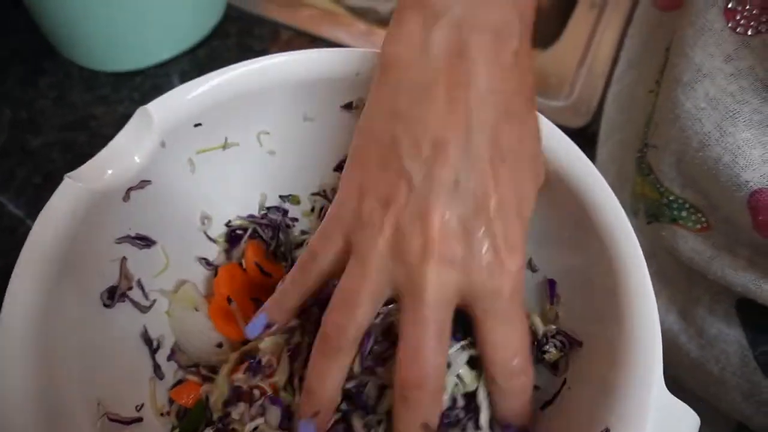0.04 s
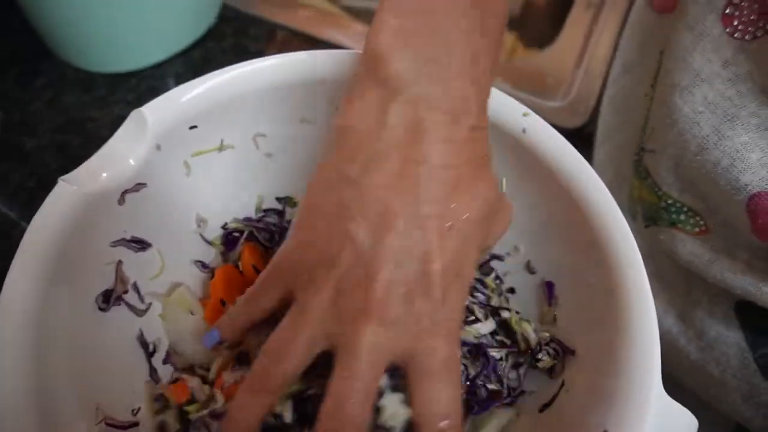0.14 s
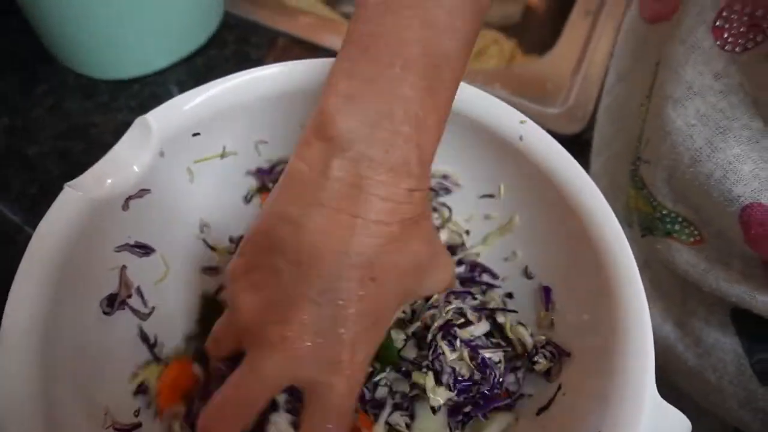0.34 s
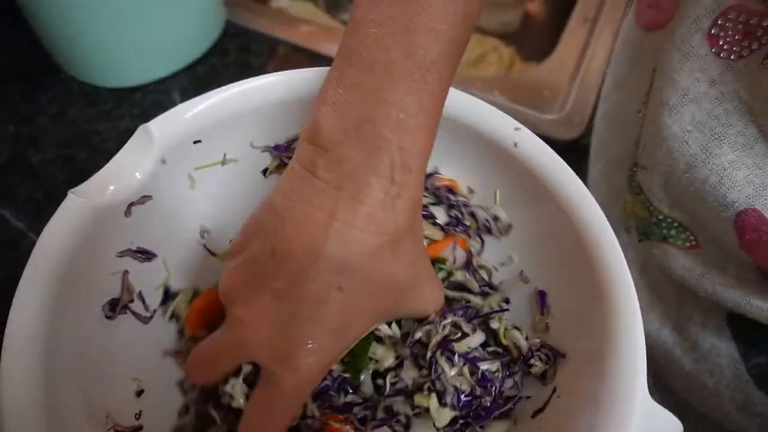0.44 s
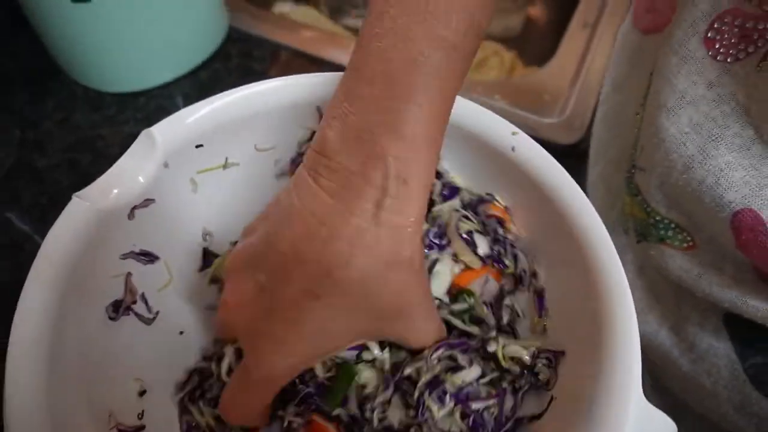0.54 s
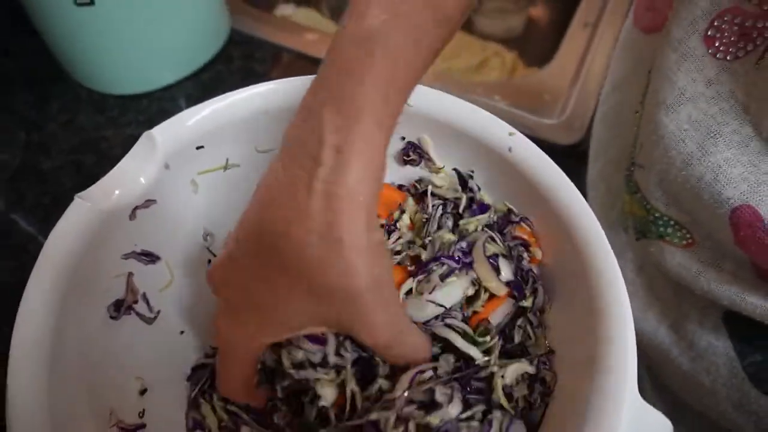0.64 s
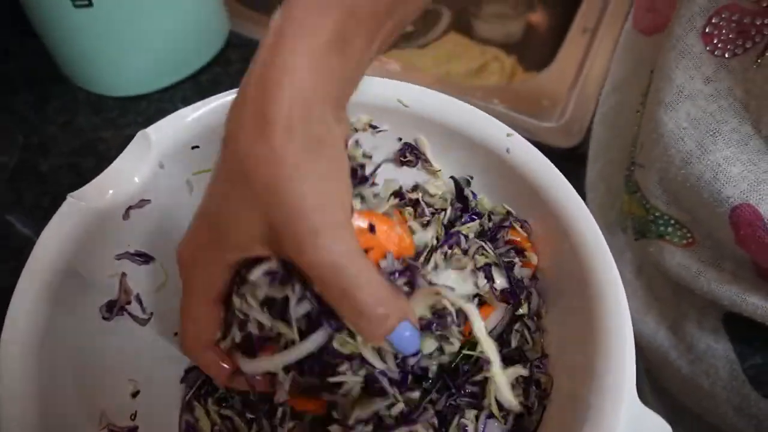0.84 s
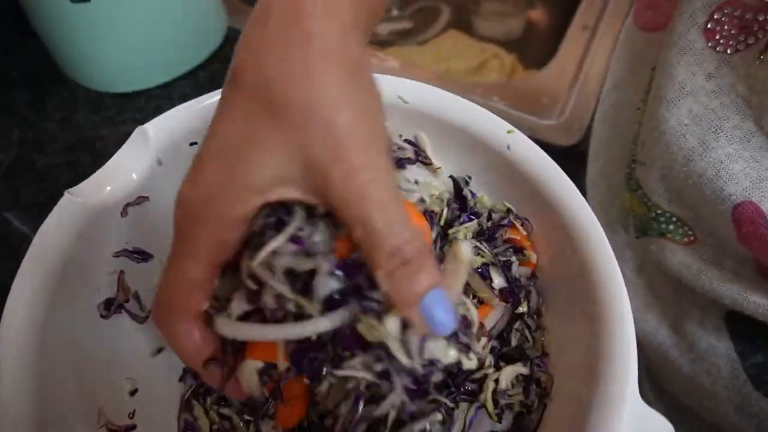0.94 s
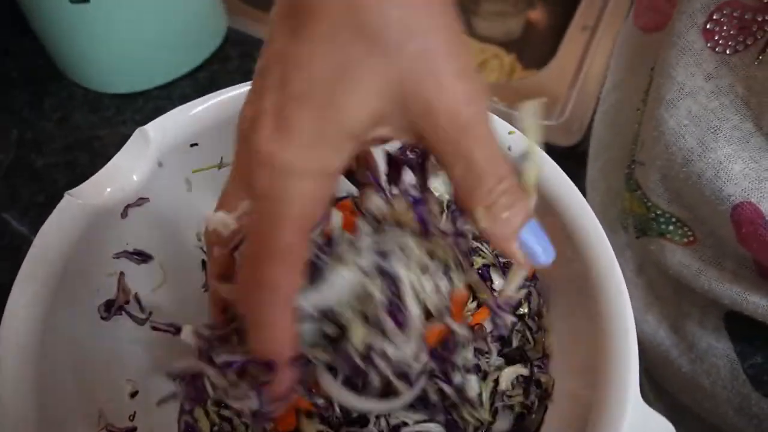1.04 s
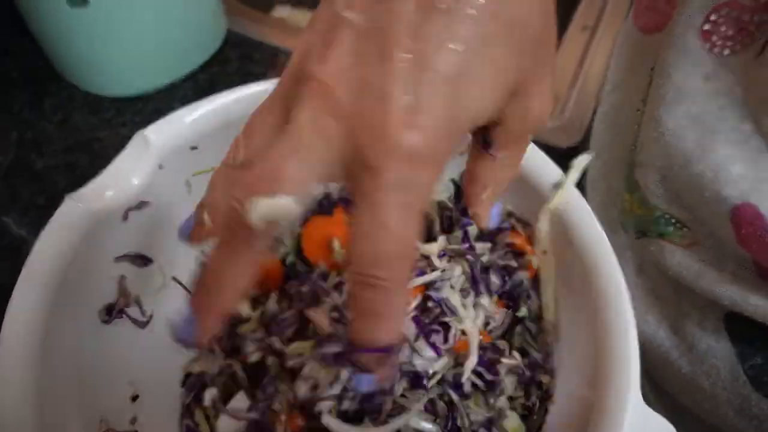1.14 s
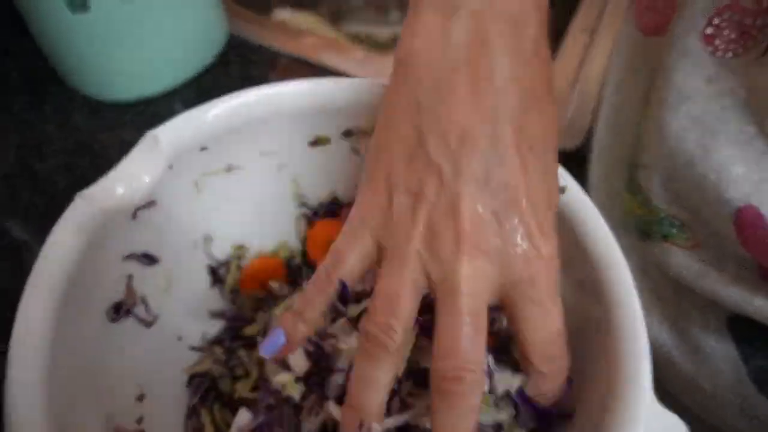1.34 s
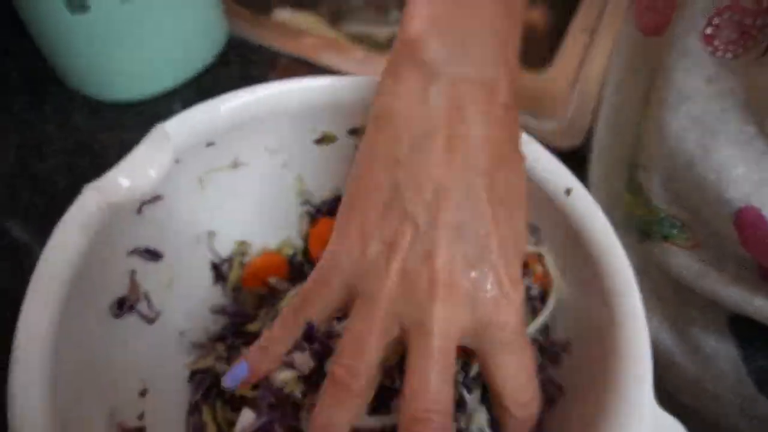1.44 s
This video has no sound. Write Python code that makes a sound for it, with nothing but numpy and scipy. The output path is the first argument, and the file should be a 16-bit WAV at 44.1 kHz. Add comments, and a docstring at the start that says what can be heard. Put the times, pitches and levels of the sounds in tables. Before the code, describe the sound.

A hand squeezes shredded cabbage and carrot in a plastic bowl: a wet rustle swells with quick crackling crunches and snaps, then drops to sparse faint ticks. Close microphone, quiet kitchen with a short reflection.

```python
"""A hand digs into shredded cabbage and carrot in a plastic bowl: faint bumps ring the bowl's damped modes.
Wet shreds rustle in thousands of filtered ticks, strongest at mid-scene as the fist squeezes.
Meanwhile fibre bundles crunch in fast runs of cracks, strands snap as damped sines, more bumps thud softly.
The fistful is lifted and falls: the rustle sinks, then sparse faint crunches and snaps follow.
Heard from close by in a quiet kitchen: a short noise tail, steady filtered noise and a faint tone."""
import sys
import numpy as np
from scipy import signal
from scipy.fft import rfft, irfft, next_fast_len
from scipy.io import wavfile

SR = 44100
rng = np.random.default_rng(int(sys.argv[2]) if len(sys.argv) > 2 else 0)


def put_to_file(sound):
    """Save the sound as 16-bit audio at rate SR, in the file named by the first command-line argument."""
    columns = np.atleast_2d(sound).T  # one column per channel
    safe = np.clip(columns, -1, 1)
    whole_steps = np.round(safe * 32767)
    wavfile.write(sys.argv[1], SR, whole_steps.astype(np.int16))


N = 66150
T = np.arange(N) / SR


def from_db(db):
    """Decibels to gain."""
    return 10 ** (np.asarray(db) / 20)


def rms_one(x):
    """Scale to unit power."""
    return x / np.sqrt(np.mean(x ** 2) + 1e-20)


def cut(x, hz, kind, order=2):
    """Butterworth low- or high-pass."""
    sos = signal.butter(order, min(hz, .45 * SR), kind, fs=SR, output="sos")
    return signal.sosfilt(sos, x)


def colour(x, points):
    """Minimum-phase filter that follows a (Hz, dB) table, made by folding the cepstrum."""
    size = 2 * next_fast_len(N)
    hz, db = np.transpose(points)
    freq = np.maximum(np.arange(size // 2 + 1) * SR / size, 1)
    gain = from_db(np.interp(np.log(freq), np.log(hz), db))
    cepstrum = irfft(np.log(gain))
    cepstrum[1:size // 2] *= 2
    cepstrum[size // 2 + 1:] = 0
    response = np.exp(rfft(cepstrum))
    return irfft(rfft(x, size) * response)[..., :N]


# mean and spread over the pops; positive favours the left
LEFT_DB, PAN_SPREAD_DB, LEAD_US, LEAD_SPREAD_US = 0.9, 1.05, 12.5, 14.7
RISE_CYCLES = 0.14


def pops(start_s, height, hz, cycles, size=384):
    """Damped sines, 60 dB down after the given cycles, each with its own stereo level and time offset."""
    spot = rng.standard_normal((len(start_s), 2))
    pan_db = LEFT_DB + PAN_SPREAD_DB * spot[:, 0]
    lead_s = (LEAD_US + LEAD_SPREAD_US * spot[:, 1]) / 10 ** 6
    index = np.maximum(start_s * SR, 0).astype(int)[:, None] + np.arange(size)
    decay_per_cycle = np.float32(np.log(1000) / np.reshape(cycles, (-1, 1)))
    channels = []
    for side in (1, -1):
        onset_s = (start_s - side * lead_s / 2)[:, None]
        turns = (np.maximum(index / SR - onset_s, 0) * hz[:, None]).astype("f4")
        decay = np.minimum(turns * decay_per_cycle, 20)
        wave = np.sin(2 * np.pi * turns) * np.exp(-decay) * np.tanh(turns / RISE_CYCLES)
        wave = wave * (height * from_db(side * pan_db / 2))[:, None]
        channels.append(np.bincount(index.ravel(), wave.ravel(), N)[:N])
    return np.array(channels)


def sizes(count, spread_db):
    """Many small grains and a few large ones, of either sign."""
    chance = rng.random((count, 2))
    size_db = spread_db * np.minimum(-np.log(1 - chance[:, 0]), 4.5)
    return from_db(size_db) * np.sign(chance[:, 1] - .5)


# Rubbing of the shreds. Each row: time in seconds, body in dB, treble in dB, both before RUSTLE_DB.
RUSTLE_LEVELS = [(0, -74.5, -73), (0.085, -76, -74), (0.099, -48, -52.5), (0.154, -55, -58),
                 (.2, -45.5, -51.5), (.283, -49.5, -49), (0.351, -46, -47), (.42, -43, -45),
                 (.5, -39.5, -43.5), (.615, -39.5, -44), (0.689, -46, -55), (.78, -53.5, -61),
                 (.822, -49.5, -59), (0.854, -57.5, -66), (.95, -69, -68.5), (1.04, -72, -65),
                 (1.094, -69.5, -70), (1.116, -65.5, -71), (1.16, -70.5, -67.5), (1.205, -59.5, -61.5),
                 (1.25, -97, -91), (1.34, -76, -80), (1.41, -71, -75.5), (1.455, -65, -68.5),
                 (1.5, -63.5, -66)]
# Filter on the ticks. Each row: frequency in Hz, gain in dB.
RUSTLE_COLOUR = [(60, -56.5), (200, -37.5), (450, -36), (640, -24.5), (790, -31.5), (1100, -17.5),
                 (1230, -17), (1550, -4.5), (1780, -3.5), (2200, -2.5), (2550, -3.5), (3300, -5),
                 (4400, -3), (6800, -16), (8500, -24.5), (15000, -40.5)]
# Top band against the rest of the treble. Each row: time in seconds, gain in dB.
FIZZ_GAIN = [(.2, -9), (.29, 7.5), (.45, -2), (.62, -9), (.8, -2.5), (1.1, 6)]
TREBLE_FROM_HZ, FIZZ_FROM_HZ = 3070, 10040
GRAIN_SPREAD_DB, GRAIN_CYCLES, RUSTLE_DB = 2.5, 25.7, -0.72


def rustle(count=11000):
    """Wet shreds slip past each other in thousands of tiny ticks; body and treble vary separately."""
    start_s = rng.random(count) * N / SR
    hz = 500 + 14500 * rng.random(count) ** 2
    heights = sizes(count, GRAIN_SPREAD_DB) * hz ** (3 / 4)
    ticks = colour(pops(start_s, heights, hz, GRAIN_CYCLES, size=192), RUSTLE_COLOUR)
    body = rms_one(cut(ticks, TREBLE_FROM_HZ, "low", order=3))
    treble = rms_one(cut(ticks, TREBLE_FROM_HZ, "high", order=3))
    fizz = cut(treble, FIZZ_FROM_HZ, "high", order=3)
    fizz = fizz * from_db(np.interp(T, *np.transpose(FIZZ_GAIN)))
    treble = cut(treble, FIZZ_FROM_HZ, "low", order=3) + fizz
    time_s, body_db, treble_db = np.transpose(RUSTLE_LEVELS)
    body = body * from_db(np.interp(T, time_s, body_db))
    treble = treble * from_db(np.interp(T, time_s, treble_db))
    return from_db(RUSTLE_DB) * (body + treble)


CRACK_SPREAD_DB, CRACK_CYCLES = 1.94, 25


def run_of_cracks(length_s, low_hz, high_hz, fade_db, start_s, count=30):
    """A bundle tears in a quick run of cracks over a pitch range; energy of unit power for its length."""
    along = (np.arange(count) + rng.random(count)) / count
    hz = rng.permutation(np.geomspace(low_hz, high_hz, count))
    heights = sizes(count, CRACK_SPREAD_DB) * from_db(-fade_db * along)
    cracks = pops(start_s + length_s * along, heights, hz, CRACK_CYCLES)
    return rms_one(cracks) * np.sqrt(abs(length_s) * SR / N)


# Fibre bundles give way. Each row: start in seconds, length in seconds, level in dB before echo and band
# limits, lowest pitch in Hz, highest pitch in Hz, fade over the run in dB (negative swells).
CRUNCHES = [(0.1704, .004, -44, 1300, 3500, -13), (.2132, 0.00206, -37, 1876, 2450, -8),
            (0.2301, 0.0088, -44.5, 4900, 6860, -2), (0.2451, 0.0045, -28, 2000, 3480, 0),
            (0.2457, 0.0041, -32, 4320, 8200, -2), (.246, .019, -52.5, 7400, 13900, 15),
            (0.2973, 0.0025, -41, 1880, 4250, 11.5), (.303, 0.00307, -39, 1960, 3970, -1),
            (0.3377, .003, -36.5, 2000, 3930, 4), (0.358, .006, -38, 2010, 2370, -1),
            (0.407, .002, -34, 1650, 3800, 12), (0.4337, 0.0045, -29, 1460, 4300, -3.5),
            (.5275, .012, -25, 2430, 5230, 2.5), (0.5541, .007, -28.5, 1980, 4230, -1),
            (0.5687, 0.00253, -27.5, 1770, 3850, 3), (0.614, 0.0065, -34, 1400, 1960, -9),
            (0.808, .012, -46.5, 1380, 3220, -10), (0.8784, 0.0024, -54.5, 1960, 12000, -5),
            (0.895, 0.0035, -55, 4430, 5500, -7), (1.032, .01, -53.5, 1870, 2810, 11),
            (1.109, 0.032, -62, 2550, 8150, 4), (1.152, .015, -62, 750, 1190, -7),
            (1.2171, 0.0035, -48, 1960, 2950, 5), (1.3966, 0.0021, -51, 1810, 4600, -9),
            (1.4237, 0.0032, -53.5, 1690, 2400, 2), (1.445, 0.01, -54, 1650, 2350, -2)]


def crunches():
    """Bundles give way as the fist closes and the shreds settle, each in a run of cracks."""
    total = np.zeros((2, N))
    for start_s, length_s, db, low_hz, high_hz, fade_db in CRUNCHES:
        total += from_db(db) * run_of_cracks(length_s, low_hz, high_hz, fade_db, start_s)
    return total


# Single strands snap. Each row: start in seconds, height in dB before the band limits, pitch in Hz,
# ring to -60 dB in cycles.
SNAPS = [(0.2306, -30, 2380, 9.6), (.4812, -29, 2520, 14), (0.5061, -14.5, 3020, 5.2),
         (.5174, -26.5, 3170, 8.5), (0.5707, -9.5, 1980, 2.4), (0.5963, -26, 1730, 9),
         (.6394, -15, 1970, 5.6), (0.7144, -24, 1796, 12), (0.7397, -19.5, 1867, 12.3),
         (0.769, -40.5, 1730, 6.6), (0.9914, -46.5, 2250, 20), (1.3542, -54, 1920, 36)]


def snaps():
    """Each strand breaks with a single wet pop, a damped sine."""
    start_s, db, hz, cycles = np.transpose(SNAPS)
    return pops(start_s, from_db(db), hz, cycles)


WALL_ECHO_S, WALL_ECHO_DB = 0.000931, -14.5


def wall_echo(x):
    """The side of the bowl sends back one early reflection."""
    echo = np.array([np.interp(T - WALL_ECHO_S, T, channel, left=0) for channel in x])
    return x + from_db(WALL_ECHO_DB) * echo


# The hand pushes on the bowl. Each row: start in seconds, length in seconds, level in dB before the
# edge filters, upper edge in Hz, lower edge in Hz.
BUMPS = [(.097, 0.0092, -55, 600, 69.6), (0.117, 0.022, -57.5, 604, 71), (0.21, 0.0098, -63.5, 900, 440),
         (0.564, 0.011, -50, 1100, 616), (0.601, 0.006, -55, 650, 596), (0.61, 0.0097, -57.5, 655, 604)]
# Modes of the loaded bowl. Each row: frequency in Hz, level in dB, decay to -60 dB in seconds.
BOWL_MODES = [(67.4, -21, 0.18), (124.8, -18.5, 0.32), (199.7, -5, 0.15), (275, -1, 0.11), (380, 5.5, 0.12),
              (470, 2, 0.12), (613.5, 8, 0.06), (1118, 11.5, 0.042)]


def bowl():
    """Rough pushes, as noise bursts through the vegetables, ring the damped modes of the plastic."""
    pushes = np.zeros(N)
    for start_s, length_s, db, high_hz, low_hz in BUMPS:
        swell = np.sin(np.pi * np.clip((T - start_s) / length_s, 0, 1))
        grit = rms_one(rng.standard_normal(N) * swell) / np.sqrt(N)  # unit energy
        grit = cut(cut(grit, high_hz, "low"), low_hz, "high", order=6)
        pushes += from_db(db) * grit
    ring = np.zeros(N)
    for k, (hz, db, t60_s) in enumerate(BOWL_MODES):
        mode = np.sin(2 * np.pi * hz * T) * np.exp(-np.log(1000) * T / t60_s)
        ring += from_db(db) * mode * (-1) ** k
    return signal.fftconvolve(pushes, ring)[:N] * from_db([[LEFT_DB / 2], [-LEFT_DB / 2]])


ROOM_T60_S, ROOM_DB, ROOM_SIDE_DB, ROOM_DELAY_S = 0.33, -9.5, -13.5, 0.0025


def kitchen(x):
    """A short diffuse tail from the hard surfaces around, as decaying noise."""
    decay = np.exp(-np.log(1000) * T / ROOM_T60_S) * (T > ROOM_DELAY_S)
    mid, side = rng.standard_normal((2, N)) * decay
    tail = rms_one(mid + from_db(ROOM_SIDE_DB) * side * [[1], [-1]]) / np.sqrt(N)
    return from_db(ROOM_DB) * signal.fftconvolve(x, tail, axes=1)[:, :N]


SIDE_LIFT_DB, SIDE_LIFT_HZ = -4.5, 10000


def widen(x):
    """The highest crackle spreads wider: treble of the stereo difference is added."""
    side = (x[0] - x[1]) / 2
    return x + from_db(SIDE_LIFT_DB) * cut(side, SIDE_LIFT_HZ, "high", order=1) * [[1], [-1]]


# Quiet of the kitchen. Each row: frequency in Hz, relative level in dB.
AIR_COLOUR = [(30, -14), (70, -13.5), (130, -12.5), (280, -7.5), (400, -2), (490, 1.5), (570, -0.5),
              (1000, -3.5), (2000, -5), (3300, -5), (8000, -13), (15000, -22.5)]
AIR_DB, AIR_SIDE_DB, AIR_SPLIT_HZ = -73, -5, 10000


def air():
    """Faint steady room noise, wider towards the treble."""
    mid, side, hiss = rng.standard_normal((3, N))
    side = from_db(AIR_SIDE_DB) * side + cut(hiss, AIR_SPLIT_HZ, "high", order=1)
    return from_db(AIR_DB) * rms_one(colour(mid + side * [[1], [-1]], AIR_COLOUR))


HUM_HZ, HUM_WIDTH_HZ, HUM_DB = 501.2, 15, -86


def hum():
    """A faint, wavering tone in the room: noise through a narrow resonance."""
    b, a = signal.iirpeak(HUM_HZ, HUM_HZ / HUM_WIDTH_HZ, fs=SR)
    return from_db(HUM_DB) * rms_one(signal.lfilter(b, a, rng.standard_normal(N)))


CRISP_LOW_HZ, CRISP_HIGH_HZ = 1350, 9200


def scene():
    """Vegetables and bowl in the kitchen; breaking fibres are band-limited."""
    breaking = wall_echo(crunches()) + snaps()
    breaking = cut(breaking, CRISP_LOW_HZ, "high", order=4)
    breaking = cut(breaking, CRISP_HIGH_HZ, "low", order=1)
    close = rustle() + breaking + bowl()
    return widen(close + kitchen(close)) + air() + hum()


CUTOFF_HZ = 15750


def record(dry):
    """A steep elliptic low-pass cuts the top."""
    sos = signal.ellip(10, .1, 70, CUTOFF_HZ, fs=SR, output="sos")  # ripple, stopband in dB
    return signal.sosfilt(sos, dry)


dry = scene()
out = record(dry)
put_to_file(out)
```